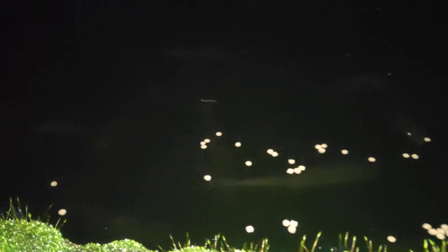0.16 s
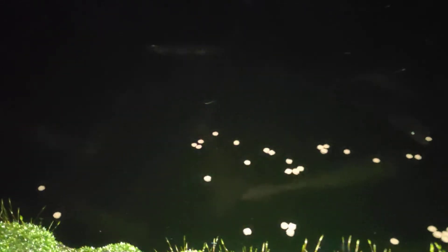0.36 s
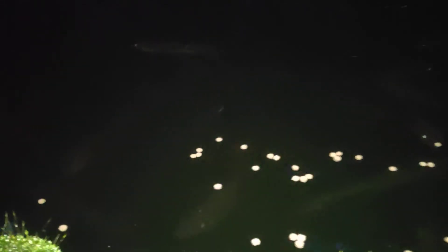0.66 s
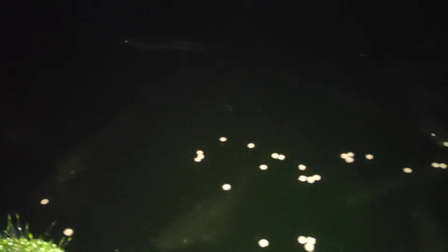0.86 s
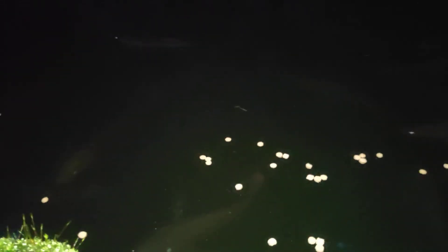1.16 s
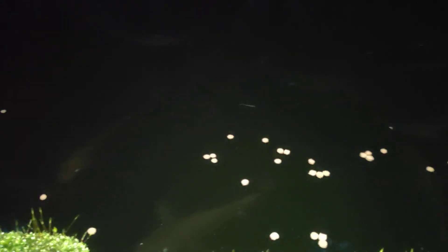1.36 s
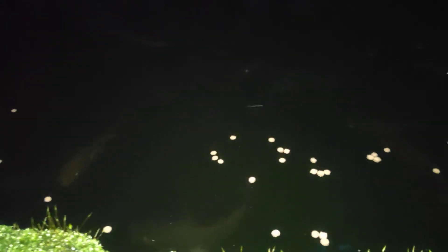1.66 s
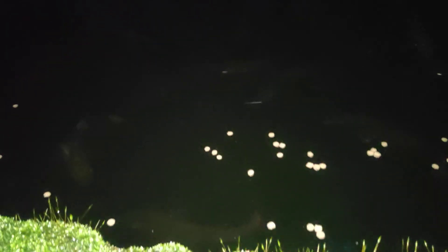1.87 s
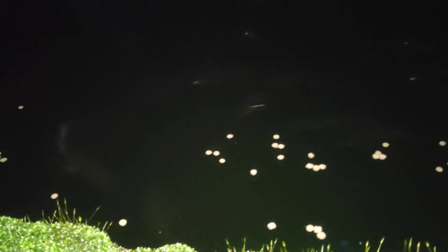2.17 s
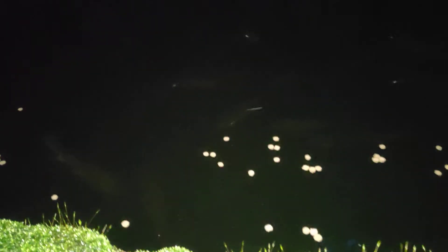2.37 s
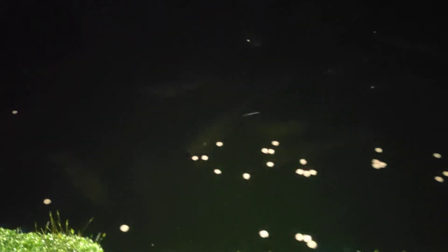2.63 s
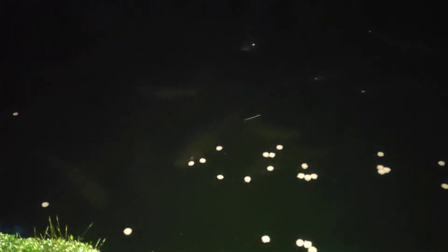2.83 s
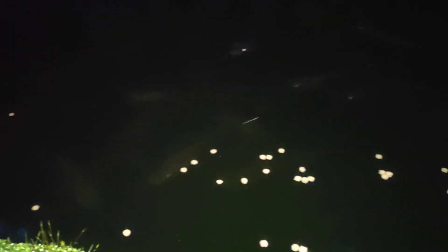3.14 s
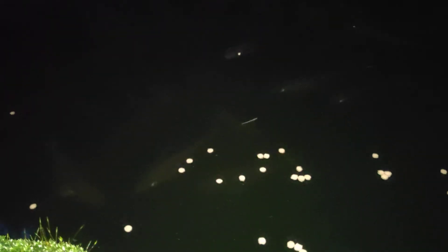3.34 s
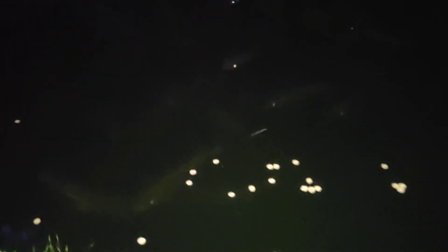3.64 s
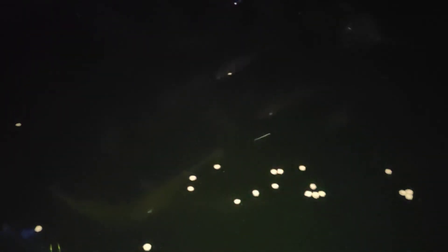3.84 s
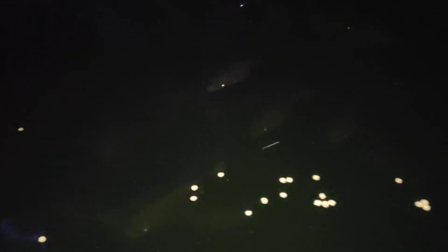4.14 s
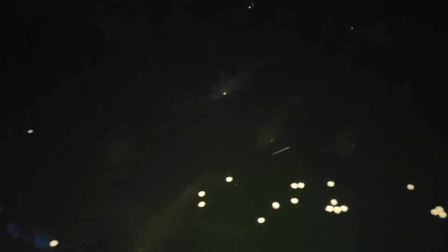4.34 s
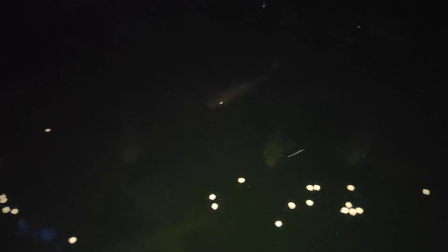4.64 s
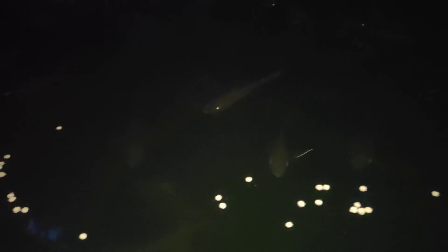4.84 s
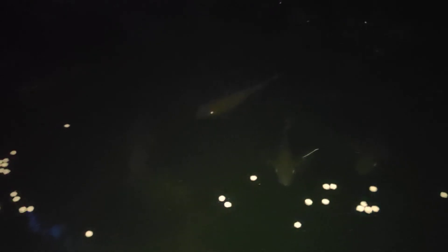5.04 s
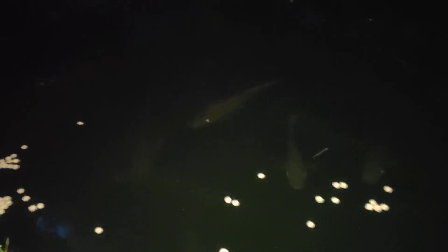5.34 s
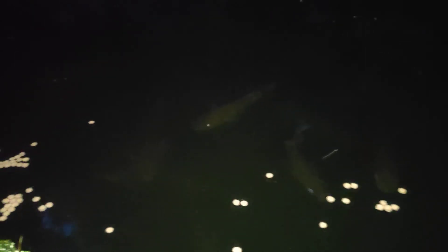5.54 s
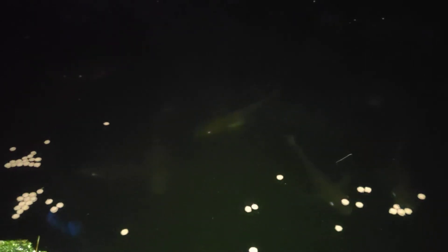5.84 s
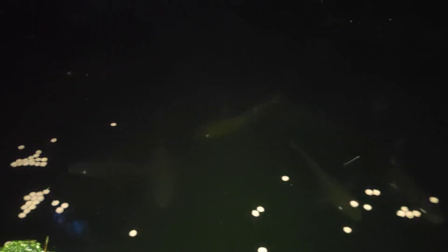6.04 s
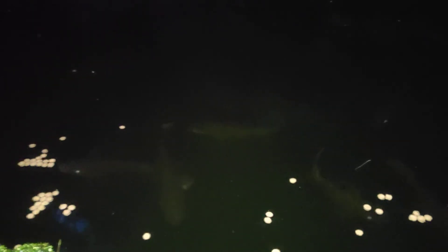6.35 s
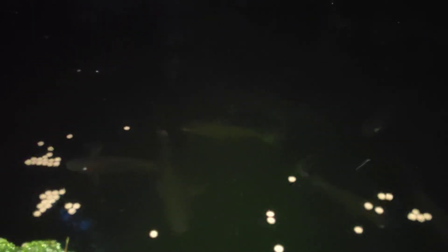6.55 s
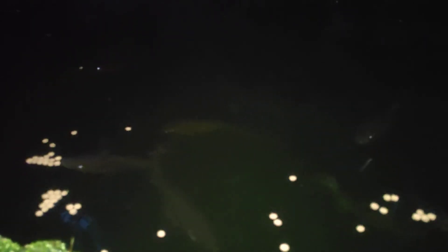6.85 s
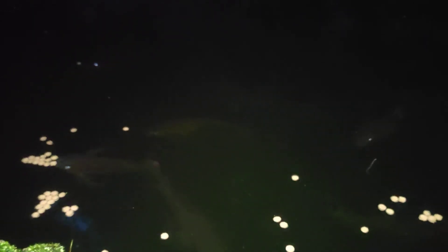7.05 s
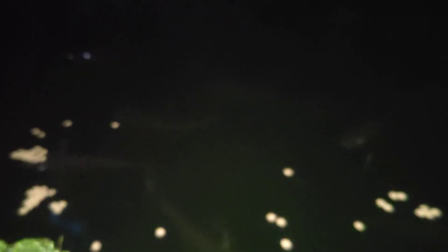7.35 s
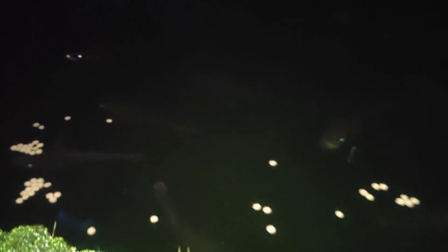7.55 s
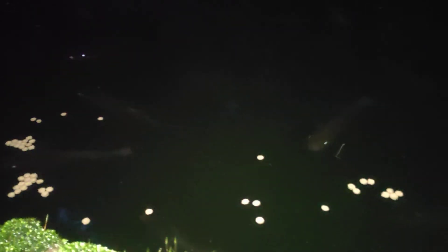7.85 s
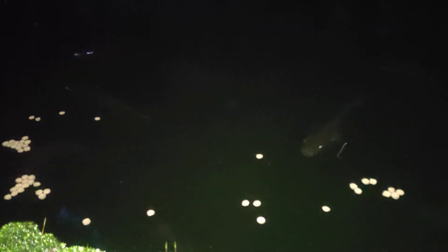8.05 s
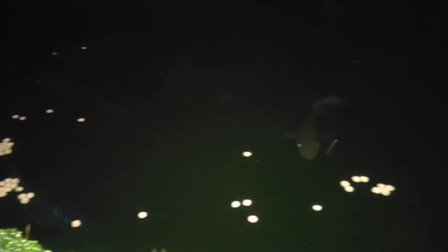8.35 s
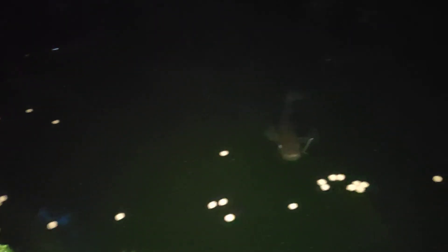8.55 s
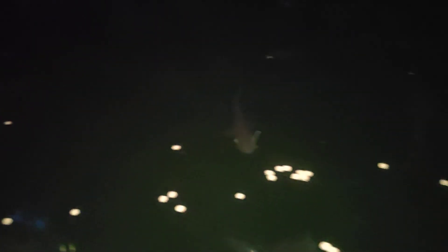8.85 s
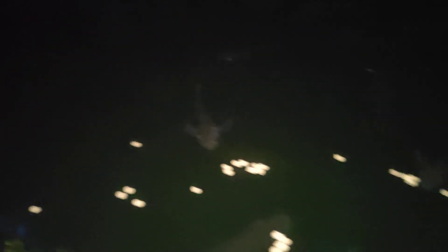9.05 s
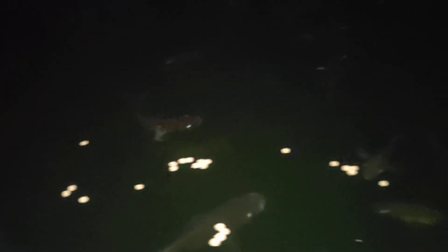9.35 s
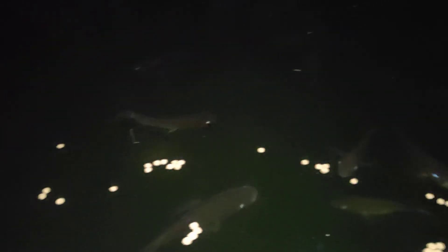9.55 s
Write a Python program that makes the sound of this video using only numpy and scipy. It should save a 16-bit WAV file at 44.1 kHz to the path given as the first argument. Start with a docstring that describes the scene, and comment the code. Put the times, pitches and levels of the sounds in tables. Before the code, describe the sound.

An unbroken night chorus of many distant frogs, high and pulsing, fills the outdoor air round a fish pond. Over it, near frogs give sharp bright rattles of a few rapid pulses, alternating sides, plus single pips, left-leaning buzzes and dry ticks. Far calls arrive blurred by echo. Small water plips, soft insect shrilling, light hiss and a quiet rumble lie beneath, heard in wide stereo.

```python
"""Night frogs round a fish pond

Close to the stereo microphone, tree frogs rattle in quickening pulse trains and give single pips; a lower-
voiced frog ticks and a higher one buzzes. Across the water more frogs call, and a far chorus swells and ebbs.
Each frog pulse is a decaying tone; filtered noise tails stand for the echo of banks and trees. Insects and
overtones of the frogs make narrow bands of shrill noise, the water plips with ringing air, thin whistles glide
high above, and a low rumble with soft hiss lies under everything."""
import sys
import numpy as np
from scipy import signal
from scipy.fft import rfft, irfft, next_fast_len
from scipy.io import wavfile
from scipy.ndimage import uniform_filter1d, map_coordinates

SR = 44100
rng = np.random.default_rng(int(sys.argv[2]) if len(sys.argv) > 2 else 0)


def unload_audio(sound):
    """Save the sound as a 16-bit wav file, at the path given as the first command line argument."""
    columns = np.transpose(np.atleast_2d(sound))
    # keep every value between -1 and 1, then stretch to whole-number steps
    steps = np.round(np.clip(columns, -1, 1) * 32767)
    wavfile.write(sys.argv[1], SR, steps.astype(np.int16))


N = 427769

# rumble and hiss of the night air, spectrum shape: f/Hz, relative density/dB
AIR_SPECTRUM = [(20, -6.5), (46, 1), (70, -4.5), (95, -5), (200, -15), (300, -18.5), (600, -19),
                (1100, -23.5), (2500, -22), (5000, -20.5), (9000, -27.5), (12000, -32.5), (16000, -37)]
# how alike the night air is at left and right: f/Hz, correlation/1
AIR_LIKENESS = [(30, 0.88), (120, 0.98), (250, 0.78), (500, 0.75), (1000, 0), (8000, 0.087)]
# swells of the treble hiss: start t/s, end t/s, level/dB
HISS_SWELLS = [(.28, .42, -65.5), (1.2, 1.6, -67.5), (2.52, 2.85, -64.5), (3.7, 4.3, -75), (5.22, 5.4, -76),
               (6.5, 7.05, -74.5), (8.0, 8.12, -68), (8.92, 9.5, -70.5)]
# lower shrill band near 5.7 kHz, partly overtones of the frogs, coming and going: t/s, level before a fixed
# lift/dB
SHRILL_LEVELS = [(0.0, -65), (0.35, -70), (2.67, -69), (3.02, -75), (4.27, -66.5), (4.51, -76), (6.43, -70),
                 (7.27, -76.5), (8.02, -66), (8.56, -75), (8.99, -63.5), (9.7, -75)]
# faint thin whistles high above the frogs, one list each: t/s, f of the strong partial/Hz
WHISTLE_PATHS = [
    [(1.3, 13300), (1.42, 13100), (1.5, 13700), (1.65, 13200), (1.78, 11800)],
    [(3.68, 11000), (3.77, 14100), (3.88, 12400), (4.08, 11400), (4.15, 11800), (4.26, 10300)],
    [(6.5, 12400), (6.72, 12200), (6.92, 10600)],
    [(9.05, 12800), (9.28, 12200), (9.46, 10600)],
]
# mean strength of the strong partial, one value per whistle: level/dB
WHISTLE_LEVELS = [-76, -73, -79, -73]
# plips and splashes on the pond: t/s, level/dB, starting f of the trapped air/Hz, relative spray level/dB
PLIPS = [(0.053, -58, 1130, -18), (1.150, -47, 1080, -0.5), (1.799, -56, 1210, -15),
         (4.243, -52.5, 1070, 2), (5.432, -58, 1190, -13), (6.736, -52, 1500, -21), (7.949, -45, 620, 6),
         (7.951, -48, 1760, -9), (8.962, -45.5, 590, -7), (9.296, -67.5, 1490, 18)]
# most distant chorus: t/s, level/dB
BED_LEVELS = [(0, -58.5), (.25, -55.5), (1.7, -54), (3.15, -55.5), (4.5, -55.5), (5.7, -54.5), (7.8, -55.5),
              (9.05, -53.5), (9.25, -61.5), (9.4, -56), (9.7, -58)]
# far low-voiced frogs clattering together: start t/s, end t/s, level/dB
CLATTER_BOUTS = [(.12, .28, -57.5), (.65, 1.35, -58), (1.72, 1.87, -66), (2.12, 2.3, -59),
                 (3.33, 4.3, -62.5), (4.55, 5.5, -56), (5.97, 6.08, -57.5), (6.35, 7.0, -60),
                 (7.65, 7.85, -65), (8.7, 9.0, -57.5)]
# soft gliding calls from far off: t/s, length/s, first f/Hz, last f/Hz, level before the echo/dB
GLIDES = [(1.97, 0.04, 1625, 1566, -61), (2.117, 0.1, 2190, 1945, -55), (2.451, 0.16, 2446, 2196, -56),
          (3.66, 0.095, 2260, 2080, -63), (3.876, 0.13, 2620, 2325, -59), (6.44, 0.15, 2230, 2186, -61)]
# calls from across the pond, blurred by the banks: t/s, middle f/Hz, level before direct and echo gains/dB
FAR_CALLS = [(.02, 3200, -44), (.21, 3210, -44), (0.839, 3140, -44.5), (1.1, 3000, -48), (1.28, 3420, -41),
             (1.46, 3380, -55), (1.68, 3120, -47.5), (2.04, 3300, -48), (2.16, 3120, -38.5),
             (2.37, 3130, -54), (3.22, 3200, -49), (3.331, 2970, -42.5), (3.89, 3630, -52),
             (4.38, 3180, -48), (4.66, 3100, -40.5), (5.04, 3250, -57), (5.459, 3000, -46),
             (6.35, 3350, -47.5), (6.591, 3080, -51), (6.9, 3240, -42.5), (7.33, 3180, -42.5),
             (7.54, 3210, -42.5), (7.66, 3170, -45.5), (8.12, 3180, -45), (8.53, 3100, -43.5),
             (8.68, 3330, -41.5), (8.79, 2950, -43.5), (8.93, 3270, -46.5), (9.57, 3060, -45)]
# high-voiced frog: first t/s, last t/s, buzzes/1, level the run grows towards/dB
BUZZ_RUNS = [(0, 0.127, 3, -35), (.92, 1.209, 4, -42), (1.332, 1.629, 5, -34.5), (4.636, 5.126, 7, -32),
             (6.701, 7.058, 5, -39), (7.27, 7.366, 2, -42), (7.836, 7.931, 2, -42)]
# low-voiced frog: first t/s, last t/s, ticks/1, level the run grows towards/dB
TICK_RUNS = [(.987, 1.270, 4, -38), (4.582, 4.897, 4, -35.5), (7.187, 7.467, 4, -37.5),
             (7.837, 7.927, 2, -42), (8.599, 8.995, 5, -42)]
# resonances of one tick: f/Hz, mean relative level/dB, length/s
TICK_MODES = [(2080, -6, 0.0043), (2530, 5.5, 0.0011), (2840, -6, 0.0048), (4270, -9.5, 0.0043),
              (4480, -12.5, 0.0044)]
# single pips: t/s, f/Hz, length/s, level/dB, relative upper overtone level/dB, left-right/dB
PIPS = [(1.204, 2900, 0.0026, -30.5, -15.5, 5), (1.239, 2810, 0.0046, -31, -24, 3),
        (1.247, 2960, 0.0063, -30, -26, 16), (5.496, 3060, 0.0038, -27, -36, 21),
        (7.071, 3000, .004, -25, -28, 5.5), (7.102, 2917, .011, -27.5, -32, 8),
        (9.522, 3370, 0.0016, -32, -23, 4)]
# near rattles: t/s, first to last pulse/s, pulses/1, middle f/Hz, level at the crest/dB,
# relative echo level/dB, left-right/dB, relative rasp level/dB
RATTLES = [ (0.125, 0.066, 7, 3020, -24.5, -4.5, 4, -22), (0.368, 0.13, 9, 2816, -38.5, -1, -7.5, -19),
           (.671, 0.13, 14, 3260, -37, 2.5, -5.5, -15), (1.778, 0.097, 8, 2940, -43.5, 2, -1, -27),
           (2.242, 0.061, 7, 3510, -27.5, -2, -7.5, -22), (2.756, 0.084, 6, 2950, -43, 2.5, -5, -13),
           (2.947, 0.084, 7, 3230, -38, 2.5, 5, -20), (3.424, 0.071, 10, 3270, -29, -2, -6, -15),
           (3.581, .1, 5, 3180, -38.5, -5, -4, -26), (3.801, 0.085, 4, 3456, -28, -1, 13, -22.5),
           (4.102, 0.14, 8, 3140, -38.5, 3, 4, -17.5), (4.283, 0.087, 8, 3110, -34, 2, -5.5, -21),
           (4.706, 0.049, 3, 3430, -38, 8.5, -11, -23), (4.782, 0.095, 5, 3210, -29.5, 0, -3, -18.5),
           (5.196, .035, 3, 3320, -36, 4, -6, -16), (5.297, 0.068, 8, 3380, -34, 1, -0.5, -17.5),
           (5.409, 0.091, 4, 3130, -26, -2, 12, -28), (5.778, .111, 8, 2860, -38, 3.5, -2, -43),
           (5.984, .081, 5, 3040, -27.5, -2, 7, -32), (6.14, .058, 6, 3003, -27, -3, -6, -28),
           (6.264, 0.11, 8, 2810, -37.5, -2.5, -4, -16), (6.80, 0.14, 11, 2820, -40.5, 4, -3, -31),
           (7.432, .073, 7, 3060, -27, -6, 5, -25), (7.991, 0.059, 9, 3170, -29.5, -2.5, 4, -13.5),
           (8.317, .065, 6, 3280, -38, -3.5, -5, -21), (9.301, 0.078, 6, 3305, -29.5, 0.5, -3.5, -22),
           (9.426, .085, 5, 3424, -24, -2, 5, -21)]
# noisy edge of a rattle pulse, spectrum shape: f/Hz, relative density/dB
RASP_SPECTRUM = [(1200, -14), (1900, -12), (2400, 8.5), (4000, -2.5), (6000, 1.5), (8000, -7.5),
                 (11500, -9.5), (15000, -25)]
# decay of the echo off banks and trees: f/Hz, t60/s
BANK_DECAY = [(500, 0.26), (3000, 0.78), (6000, 0.7), (14000, 0.059)]
# the two microphone ports: f/Hz, left-right/dB
MIC_PORTS = [(500, 0), (1200, 0.5), (2500, 4), (3200, -1), (4500, 2), (7000, -7.5), (9500, -1), (12500, 11),
             (16000, 4.5)]

TOP_HZ = 15800  # band limit of the microphone
FAR_CALL_S = .11  # first to last pulse of a far call, before jitter
QUICKEN = .22  # gaps shrink from 1 + this to 1 - this times their mean
RISE_HZ = 90  # rise in pitch through a rattle, before each pulse's own detuning
SWELL_DB, CREST = 8.5, 0.46  # dB lost per squared fraction of the call away from the crest; place of the crest
BANK_DELAY_S = .006  # extra wait before the banks answer a rattle
TYPICAL_HZ, SHORTEN = 2975, 2.5  # higher frogs have shorter pulses, by this power of the pitch


def amp(db):
    """Decibels to gain."""
    return 10 ** (np.asarray(db) / 20)


def unit(x):
    """x at rms 1."""
    return x / np.sqrt(np.mean(x ** 2) + 1e-20)


def along(points, hz):
    """(f/Hz, value) points read on a log frequency axis."""
    f, v = np.transpose(points)
    return np.interp(np.log(hz + 1), np.log(f + 1), v)


def curves(rows):
    """One value per sample for each column after the time."""
    s, *cols = np.transpose(rows)
    return [np.interp(np.arange(N) / SR, s, c) for c in cols]


def wobble(rate):
    """A smooth random curve, rate knots a second."""
    knots = rng.standard_normal(int(N * rate / SR) + 4)
    return map_coordinates(knots, [np.arange(N) * rate / SR])


def filtered(x, response):
    """x times a response of frequency."""
    n = x.shape[-1]
    m = next_fast_len(n + 2048)
    spectrum = rfft(x, m) * response(np.fft.rfftfreq(m, 1 / SR))
    return irfft(spectrum, m)[..., :n]


def add(track, s, sound):
    """Mix a sound into a track at time s."""
    start = max(round(s * SR), 0)
    part = track[..., start:start + sound.shape[-1]]
    part += sound[..., :part.shape[-1]]


def beats(length, count, quicken):
    """Times of a train of pulses whose gaps shrink steadily (or grow, if quicken is negative)."""
    u = np.linspace(0, 1, round(count))
    return length * (u + quicken * u * (1 - u))


def runs(rows, slowing, timid_db):
    """(t/s, level/dB) of every note in runs that start softly, gain strength and slow down."""
    notes = []
    for first, last, count, db in rows:
        for k, s in enumerate(beats(last - first, count, -slowing)):
            notes.append((first + s, db - timid_db / (1 + k) ** 2))
    return notes


def bouts(rows, floor_db, attack_s, release_s):
    """Gain that rises into each (start, end, level/dB) bout, holds, and falls back to a floor."""
    t = np.arange(N) / SR
    power = amp(floor_db) ** 2
    for start, end, db in rows:
        rise = np.minimum(t - start, 0) / attack_s
        fall = np.maximum(t - end, 0) / release_s
        power = power + (amp(db) * np.exp(rise - fall)) ** 2
    return np.sqrt(power)


def panned(x, pan_db):
    """A mono sound leaning left (positive) or right at constant power; the louder side hears it earlier."""
    side = np.array([[.5], [-.5]])
    lead_s = .000012 * np.clip(pan_db, -7, 7)
    shifted = filtered(x, lambda hz: np.exp(2j * np.pi * hz * side * lead_s))
    return unit(amp(side * pan_db)) * shifted


def scatter(x, early_db=2, early_s=0.02):
    """Stereo echo of equal energy: stones close by answer at once, banks and trees die away slowly."""
    hz, t, z = signal.stft(rng.standard_normal((2, SR * 3 // 5)), SR, nperseg=256)
    early = 1 + amp(early_db) * np.exp(-t / early_s)
    decay = early * amp(-60 * t / along(BANK_DECAY, hz)[:, None])
    tail = signal.istft(z * decay, SR, nperseg=256)[1]
    tail = np.pad(tail, ((0, 0), (SR // 400, 0)))  # 2.5 ms of path
    return signal.fftconvolve(np.atleast_2d(x), tail / np.linalg.norm(tail[0]), axes=1)


def pulse(hz, length, sag=0.17, sag_s=0.00023, octave_db=-35):
    """One snap of the larynx ringing the vocal sac: it starts sharp and settles on its pitch."""
    t = np.maximum(np.arange(SR // 40) - SR // 4000, 0) / SR
    phase = 2 * np.pi * hz * (t + sag * sag_s * (1 - np.exp(-t / sag_s)))
    shape = (1 - np.exp(-t / .0005)) * np.exp(-(t / length) ** 2)
    tone = np.sin(phase) + amp(octave_db) * np.sin(2 * phase)
    return shape / shape.max() * tone


def rasp(length):
    """The broad, noisy edge of a pulse, dying away exponentially."""
    t = np.arange(SR // 40) / SR
    noise = filtered(rng.standard_normal(len(t)), lambda hz: amp(along(RASP_SPECTRUM, hz)))
    return unit(noise) * np.exp(-t / length)


def radiated(x, low_hz=1880, high_hz=4300, treble_db=-4):
    """Small vocal sacs radiate almost nothing in the bass, and less above their resonance."""
    x = signal.sosfilt(signal.butter(12, low_hz, "high", fs=SR, output="sos"), x)
    return filtered(x, lambda hz: amp(treble_db / (1 + (high_hz / (hz + 1)) ** 10)))


def night_air(level_db=-59):
    """A far rumble, nearly alike at left and right, under a soft wide hiss."""
    def mid_side_response(hz):
        turn = np.arccos(np.clip(along(AIR_LIKENESS, hz), -1, 1)) / 2
        return amp(along(AIR_SPECTRUM, hz)) * [np.cos(turn), np.sin(turn)]

    mid, side = filtered(rng.standard_normal((2, N)), mid_side_response)
    drift_db = .4 * wobble(3)
    return amp(level_db + drift_db) * unit(np.array([mid + side, mid - side]))


def high_hiss(skirt_db=-14):
    """A faint, grainy treble hiss round 11.5 kHz on a weak wide skirt: noise flickering in level."""
    def response(hz):
        return 1 / (1 + ((hz - 11500) / 4000) ** 4) + amp(skirt_db) * hz / (hz + 500)

    grains = rng.standard_normal((2, N)) * amp(2.2 * wobble(220))
    swell = bouts(HISS_SWELLS, floor_db=-74, attack_s=0.089, release_s=0.11)
    return swell * unit(filtered(grains, response))


def shrill_band(centre_hz, width_hz):
    """Shrilling merged into a narrow band of stereo noise, rms 1."""
    noise = rng.standard_normal((2, N))
    return unit(filtered(noise, lambda hz: 1 / (1 + ((hz - centre_hz) / width_hz) ** 4)))


def shrill_bands(lift_db=2, steady_db=-67.0):
    """Two trembling bands of shrill sound: the lower, near 5.7 kHz and partly overtones of the frogs, comes and
    goes; the upper, of distant insects, is steadier."""
    level_db, = curves(SHRILL_LEVELS)
    lower = amp(level_db + lift_db + 1.6 * wobble(35)) * shrill_band(5680, 220)
    upper = amp(steady_db + 0.52 * wobble(7.9) + 1.3 * wobble(30)) * shrill_band(7150, 430)
    return lower + upper


def whistles(side_db=-4):
    """Thin, wavering squeaks at the top of hearing: a strong partial among weaker, evenly spaced neighbours."""
    out, t = np.zeros(N), np.arange(N) / SR
    for path, db in zip(WHISTLE_PATHS, WHISTLE_LEVELS):
        hz = curves(path)[0] * (1 + 0.0029 * wobble(40))
        phase = 2 * np.pi * np.cumsum(hz) / SR
        start, end = path[0][0], path[-1][0]
        swell = np.interp(t, [start, start + 0.052, end - .08, end], [0, 1, 1, 0])
        for k in range(-3, 2):
            level_db = db + side_db * abs(k) + 3.6 * wobble(25)
            out += swell * amp(level_db) * np.sin((1 + k / 8) * phase)
    return panned(out, pan_db=-1)


def water(ring_s=0.0021, spray_s=0.0097, push_db=-13, spray_hz=13000, wet_db=-10):
    """A pocket of air rings with rising pitch, with a slap round its pitch, a dull push and a burst of spray."""
    def noise_band(centre_hz, width):  # width in natural log of frequency
        noise = rng.standard_normal(len(t))
        return unit(filtered(noise, lambda f: 1 / (1 + (np.log((f + 1) / centre_hz) / width) ** 4)))

    out, t = np.zeros((2, N)), np.arange(SR // 8) / SR
    for s, db, hz, spray_db in PLIPS:
        bubble = np.sin(2 * np.pi * hz * t * (1 + 8 * t)) * np.exp(-t / ring_s)
        slap = noise_band(hz, .25)
        push = amp(push_db) * noise_band(420, .5)
        spray = filtered(rng.standard_normal(len(t)), lambda f: f / (f + 2000) / (1 + (f / spray_hz) ** 2))
        burst = (0.4 * slap + push + amp(spray_db) * unit(spray)) * np.exp(-t / spray_s)
        plip = amp(db) * (0.7 * bubble + burst)
        add(out, s, panned(plip, pan_db=2.5))
        add(out, s, amp(wet_db) * scatter(plip))
    return out


def choir(pitch_hz, spread, pulse_rate, pulse_s, direct_db, count):
    """Many far frogs calling at random round one pitch, blended with their echo to a steady rms of 1."""
    dry = np.zeros((2, N))
    for i, (when, tune, pace, size, side) in enumerate(rng.uniform(-1, 1, (count, 5))):
        s = (i + when) / count * N / SR
        gain = amp(7.8 * size + side * np.array([[4], [-4]]))
        gap_s = np.exp(.25 * pace) / pulse_rate
        for k in range(-2, 3):
            at = (s + k * (1 - .04 * k) * gap_s) % (N / SR)  # the gaps shorten through each call
            hz = pitch_hz * np.exp(spread * (tune + rng.uniform(-1.12, 1) / 2))
            add(dry, at, gain * pulse(hz, pulse_s, octave_db=-17.5))
    lead = SR // 2  # the chorus is already ringing
    ringing = np.pad(dry, ((0, 0), (lead, 0)), mode="reflect")
    echo = scatter(ringing, early_db=-4.5, early_s=0.014)[:, lead:lead + N]
    blend = amp(direct_db) * dry + echo
    power = uniform_filter1d(np.mean(blend ** 2, 0), size=SR // 12)
    return blend / np.sqrt(np.abs(power) + 1e-12)


def far_chorus(join_db=-21, low_bed_db=-9):
    """Many frogs keep up a bed of sound; low voices clatter in bouts, high ones join the buzzing frog."""
    bed_db, = curves(BED_LEVELS)
    clatter = bouts(CLATTER_BOUTS, floor_db=bed_db + low_bed_db, attack_s=.05, release_s=0.066)
    join_rows = [(first, last, db + join_db) for first, last, _, db in BUZZ_RUNS]
    joining = bouts(join_rows, floor_db=-66, attack_s=.04, release_s=0.2)
    low = choir(pitch_hz=2225, spread=0.22, pulse_rate=12, pulse_s=0.0024, direct_db=-1.5, count=260)
    high = choir(pitch_hz=3780, spread=.06, pulse_rate=90, pulse_s=.0024, direct_db=-1, count=260)
    farthest = choir(pitch_hz=3180, spread=0.075, pulse_rate=70, pulse_s=0.0023, direct_db=-1, count=300)
    return clatter * low + joining * high + amp(bed_db) * farthest


def far_glides():
    """Soft, slightly quavering tones that arrive only by way of the banks."""
    out = np.zeros((2, N))
    for s, length, first_hz, last_hz, db in GLIDES:
        u = np.linspace(0, 1, round(length * SR))
        hz = first_hz + (last_hz - first_hz) * u + 12 * wobble(117)[:len(u)]
        swell = np.sqrt(u * (1 - u)) * 2
        tone = swell * np.sin(2 * np.pi * np.cumsum(hz) / SR)
        add(out, s, amp(db) * scatter(tone))
    return out


def far_calls(pulse_s=0.0019, spread=0.07, echo_db=5.5, direct_db=-0.5, count=9):
    """Rattles from across the pond, more echo than direct sound."""
    out = np.zeros((2, N))
    for start, hz, db in FAR_CALLS:
        call = np.zeros(round(FAR_CALL_S * SR) + SR // 20)
        for s, (late, tune) in zip(beats(FAR_CALL_S, count, QUICKEN), rng.uniform(-1, 1, (count, 2))):
            voice = pulse(hz * (1 + spread * tune), pulse_s, octave_db=-20.5)
            add(call, s + .002 * late, amp(db) * voice)
        add(out, start, amp(direct_db) * panned(call, pan_db=rng.uniform(-11, 7.4)))
        add(out, start, amp(echo_db) * scatter(call))
    return out


def buzzing_frog(pitch_hz=3780, gap_s=0.0085, fade_db=7.5, wet_db=-1):
    """Each short buzz is four fast pulses, each weaker than the last."""
    out = np.zeros((2, N))
    for s, db in runs(BUZZ_RUNS, slowing=.07, timid_db=11.5):
        buzz = np.zeros(SR // 15)
        for k in range(4):
            voice = pulse(pitch_hz * (1 + 0.018 * rng.normal()), length=0.0026)
            add(buzz, k * gap_s * (1 + 0.066 * rng.normal()), amp(db - fade_db * k) * voice)
        add(out, s, panned(buzz, pan_db=-9.5))
        add(out, s, amp(wet_db) * scatter(buzz))
    return out


def ticking_frog(wet_db=-8):
    """Short runs of dry ticks, each ringing the same few resonances in slightly different balance."""
    out = np.zeros((2, N))
    for s, db in runs(TICK_RUNS, slowing=0.16, timid_db=5.5):
        tick = np.zeros(SR // 40)
        for hz, level_db, length in TICK_MODES:
            tick += amp(db + level_db + rng.normal(0, 2.1)) * pulse(hz, length, sag=0.044, sag_s=0.0011)
        add(out, s, panned(tick, pan_db=3.5))
        add(out, s, amp(wet_db) * scatter(tick))
    return out


def pips(wet_db=-11, octave_lead_db=10):
    """Single pulses of a tree frog: a settling tone, a stronger octave and thin upper overtones."""
    out = np.zeros((2, N))
    for s, hz, length, db, overtone_db, pan_db in PIPS:
        octave_db = overtone_db + octave_lead_db
        pip = amp(db) * pulse(hz, length, sag=0.067, sag_s=0.0014, octave_db=octave_db)
        for k in (3, 4):
            pip += amp(db + overtone_db) * pulse(k * hz, length, sag=.02, octave_db=-120)
        add(out, s, panned(pip, pan_db))
        add(out, s, amp(wet_db) * scatter(pip))
    return out


def tree_frogs(pulse_s=0.0031, low_mode=0.767, low_db=-15):
    """Each near rattle quickens, swells and rises a little in pitch; the banks answer it."""
    out = np.zeros((2, N))
    for start, length, pulses, hz, db, echo_db, pan_db, rasp_db in RATTLES:
        call = np.zeros(round(length * SR) + SR // 30)
        typical_s = pulse_s * (TYPICAL_HZ / hz) ** SHORTEN
        for s, u in zip(beats(length, pulses, QUICKEN), np.linspace(0, 1, round(pulses))):
            size, tune, width, low = rng.uniform(-1.3, 1.3, 4)  # no two pulses are quite alike
            pitch = (hz + RISE_HZ * (u - .5)) * (1 + 0.015 * tune)
            voice = pulse(pitch, typical_s * np.exp(0.23 * width))
            voice += amp(low_db + 2 * low) * pulse(pitch * low_mode, pulse_s / 2)  # the body rings below the sac
            voice += amp(rasp_db) * rasp(length=0.0093)
            effort_db = db + 0.54 * size - SWELL_DB * (u - CREST) ** 2
            add(call, s, amp(effort_db) * voice)
        add(out, start, panned(call, pan_db))
        add(out, start + BANK_DELAY_S, amp(echo_db) * scatter(call))
    return out


def scene():
    """The pond at night, from the air around it to the frogs close by."""
    background = night_air() + high_hiss() + shrill_bands() + whistles() + water() + far_glides()
    far_frogs = far_chorus() + far_calls()
    near_frogs = buzzing_frog() + ticking_frog() + pips() + tree_frogs()
    return background + radiated(far_frogs + near_frogs)


def record(dry):
    """The two microphone ports colour the sound differently; nothing passes above the band limit."""
    def response(hz):
        return amp(np.outer([.5, -.5], along(MIC_PORTS, hz))) * (hz < TOP_HZ)

    return filtered(dry, response)


dry = scene()
out = record(dry)
unload_audio(out)
```